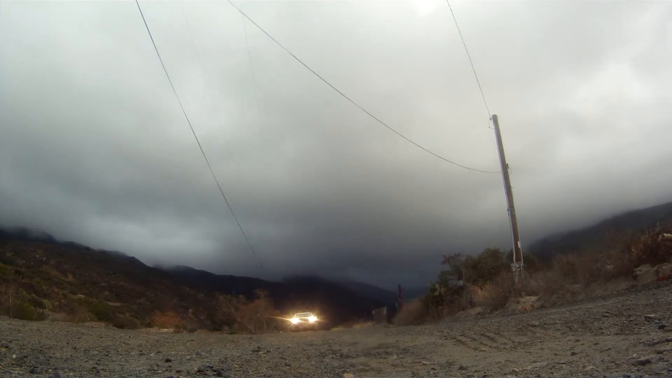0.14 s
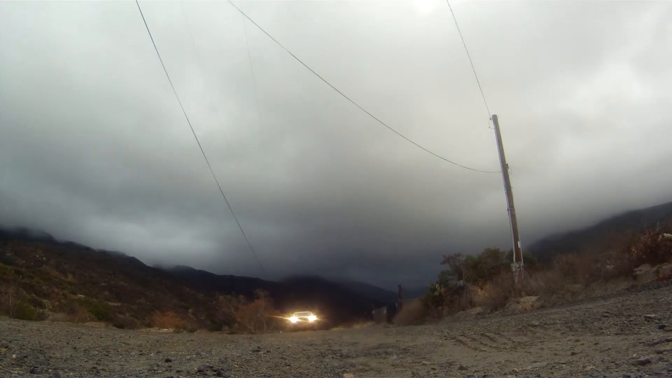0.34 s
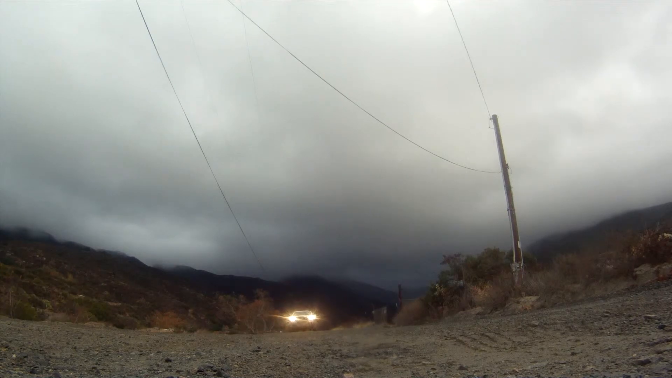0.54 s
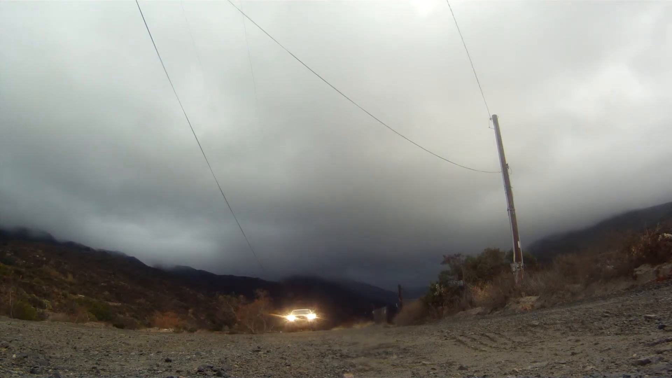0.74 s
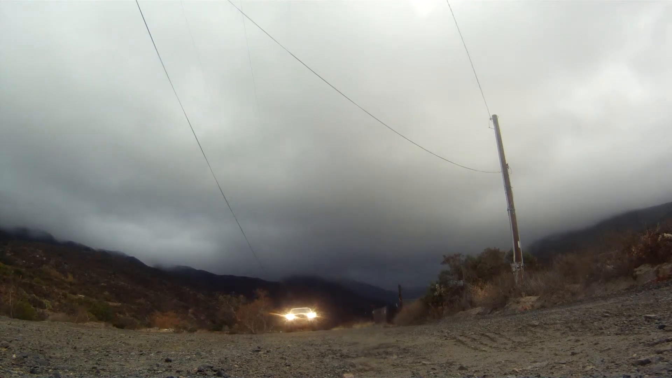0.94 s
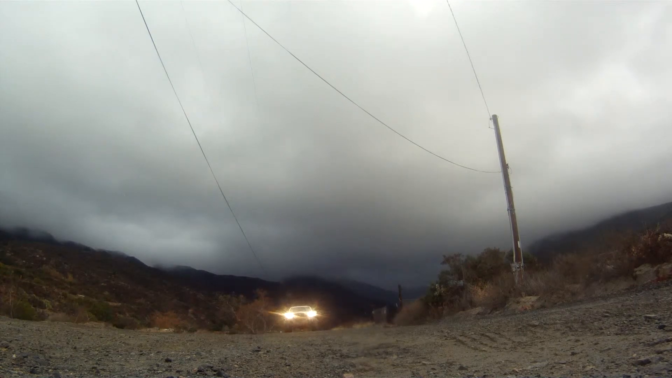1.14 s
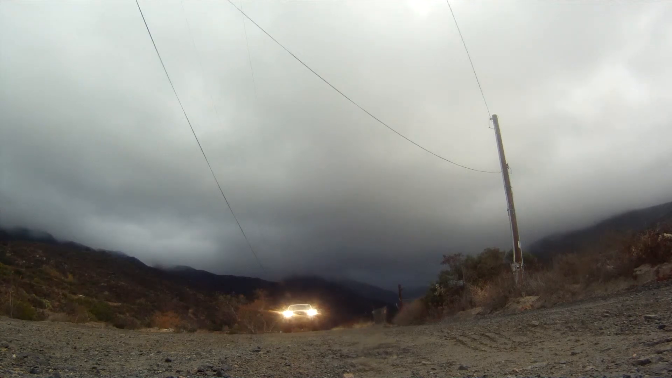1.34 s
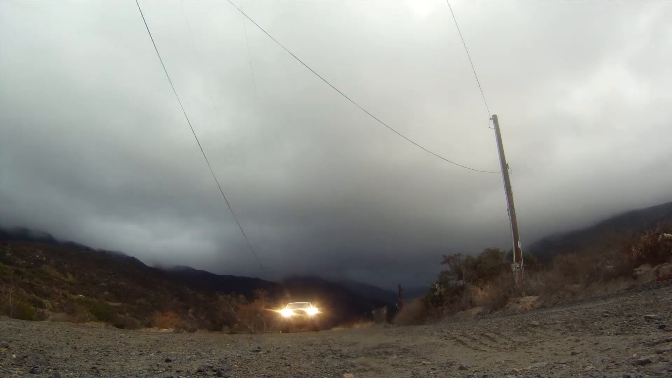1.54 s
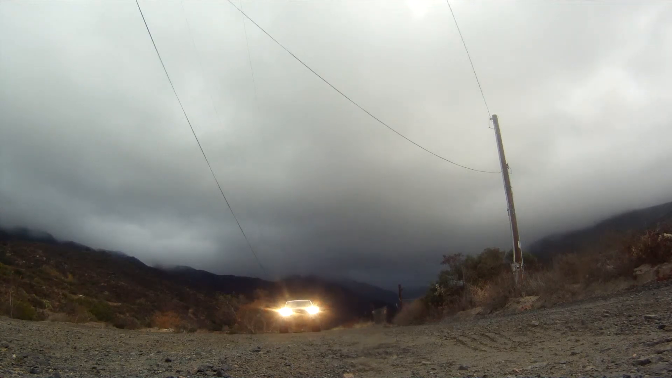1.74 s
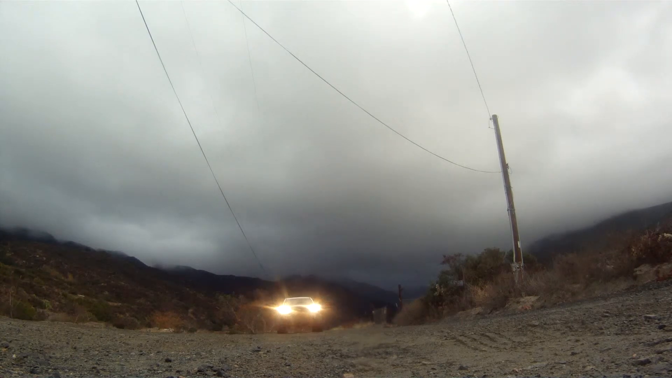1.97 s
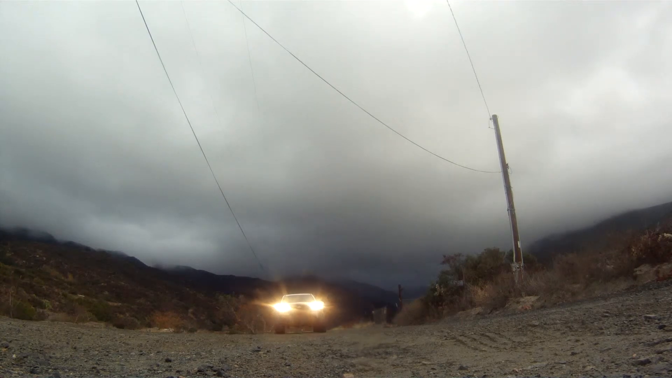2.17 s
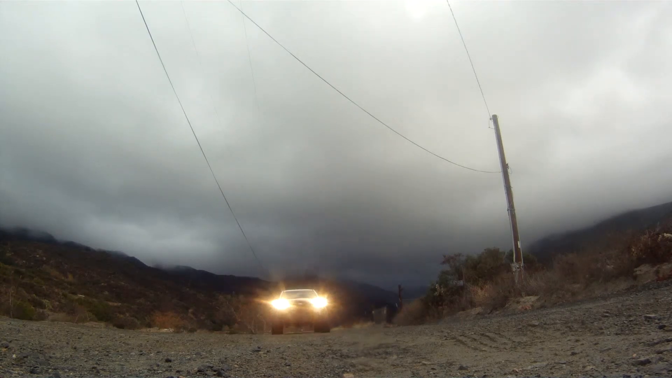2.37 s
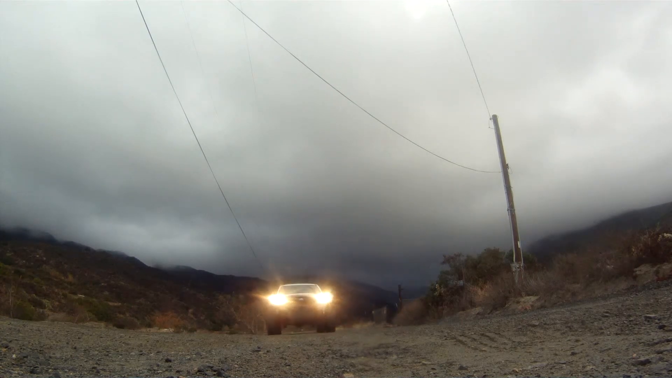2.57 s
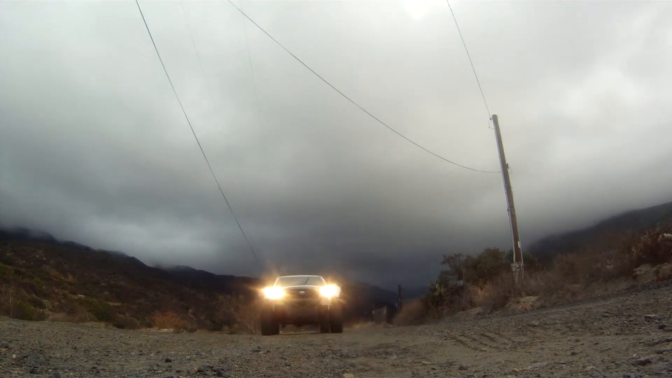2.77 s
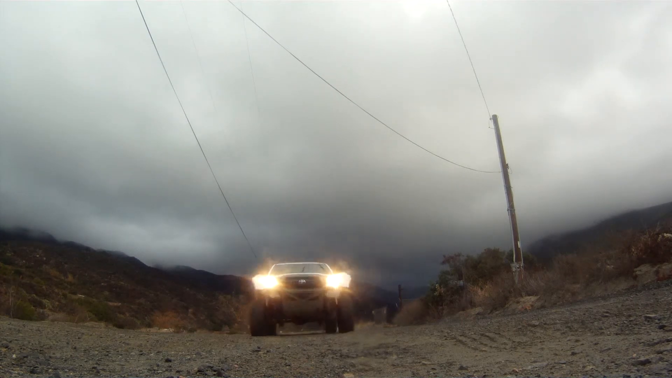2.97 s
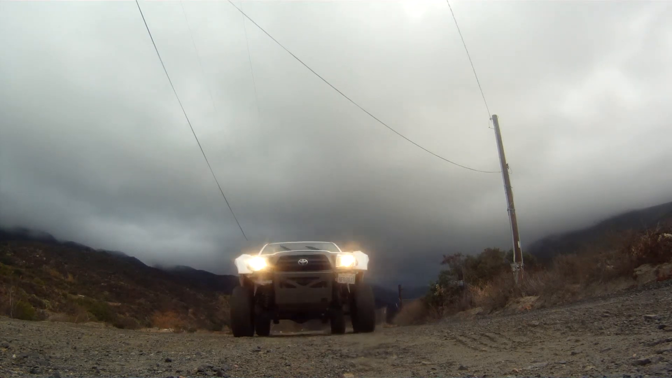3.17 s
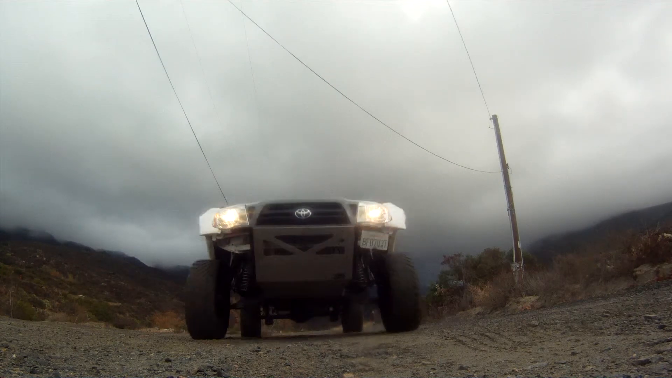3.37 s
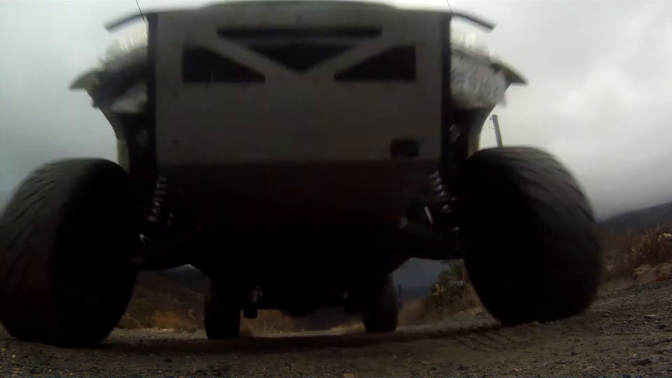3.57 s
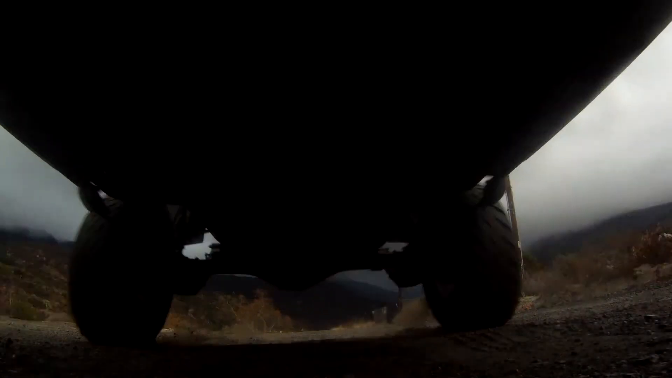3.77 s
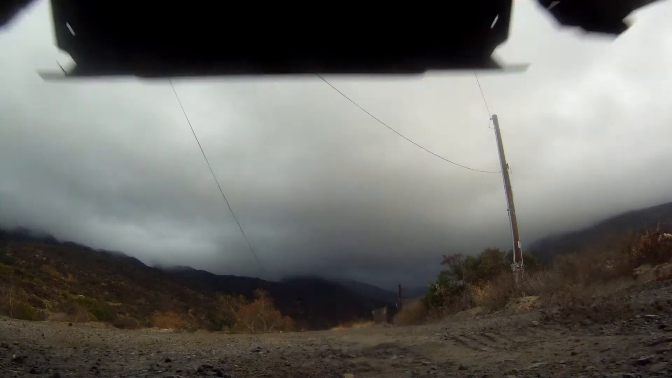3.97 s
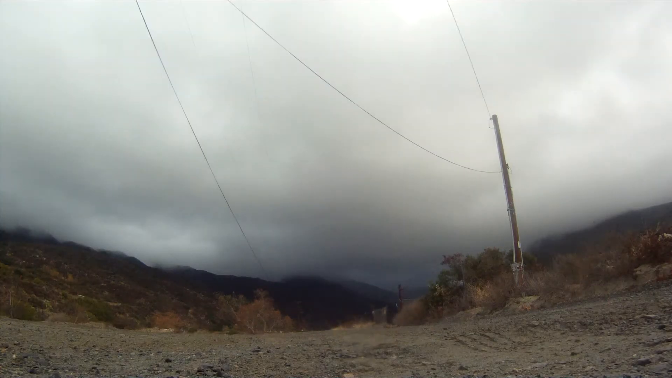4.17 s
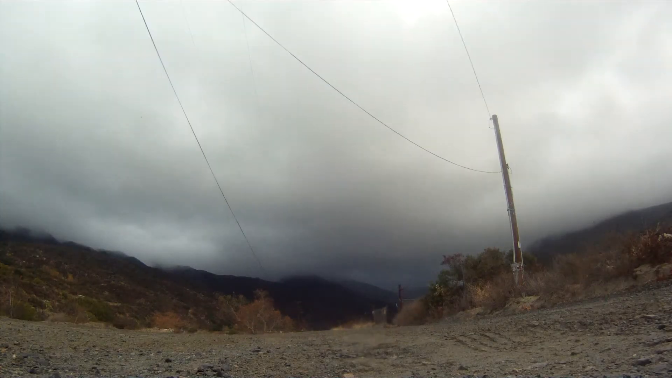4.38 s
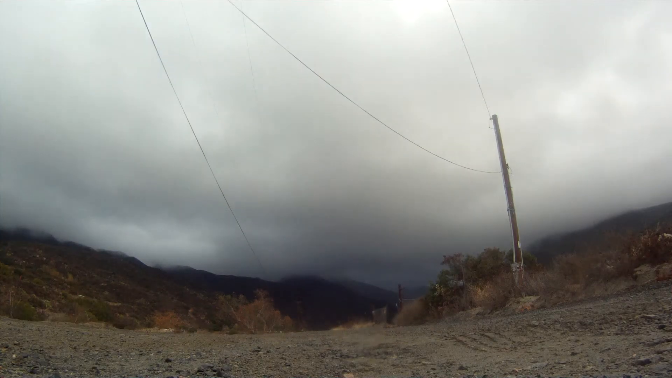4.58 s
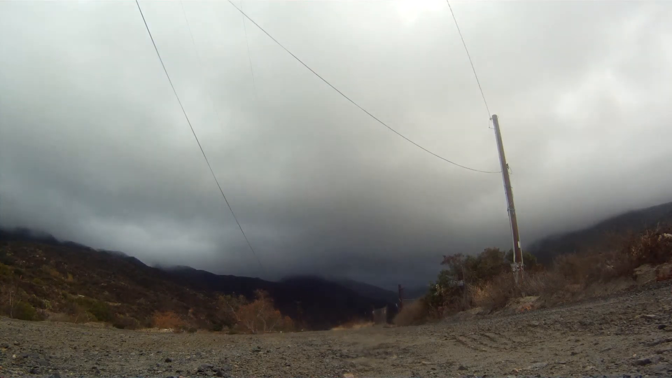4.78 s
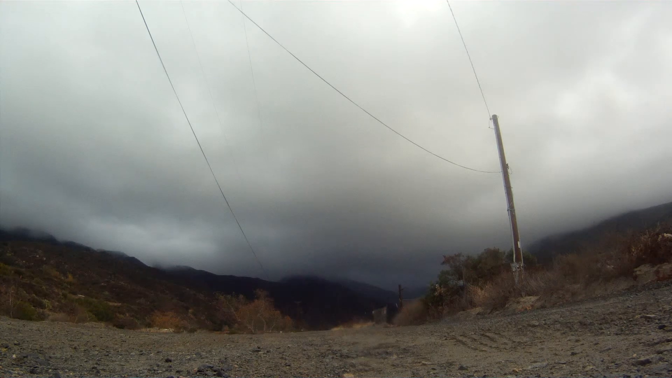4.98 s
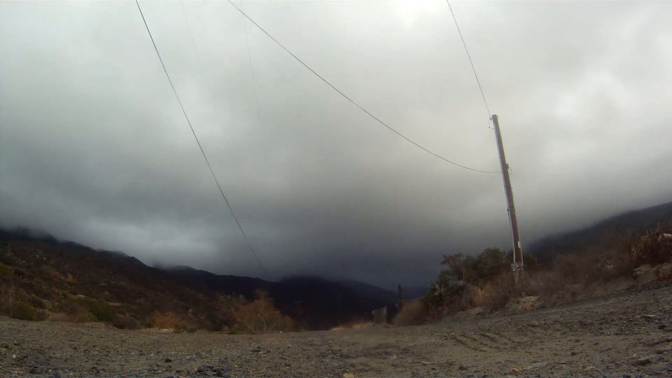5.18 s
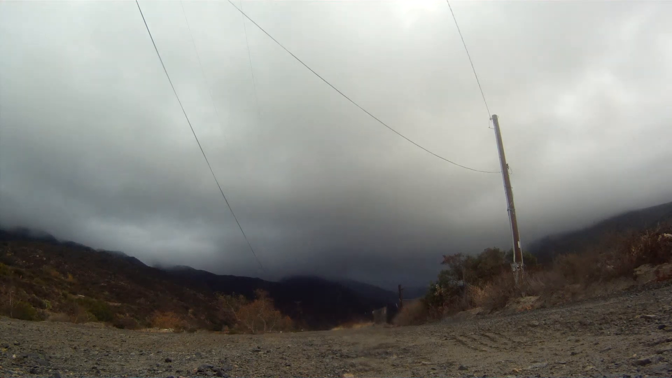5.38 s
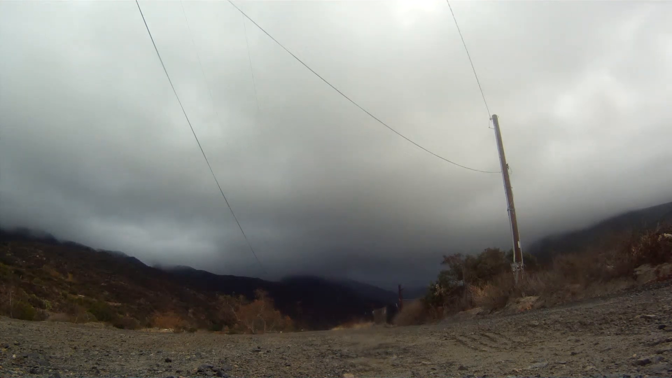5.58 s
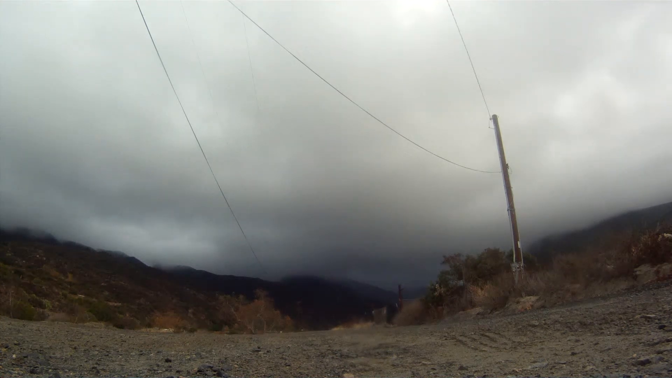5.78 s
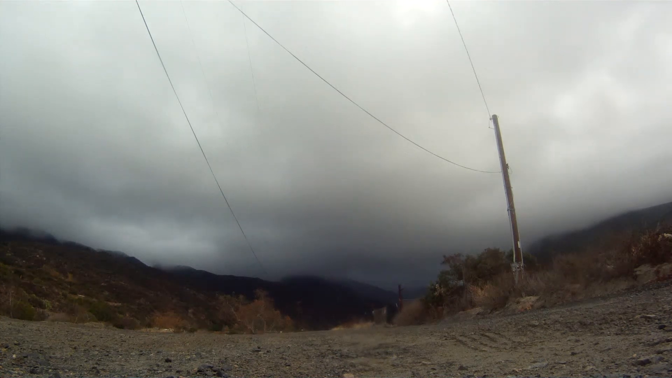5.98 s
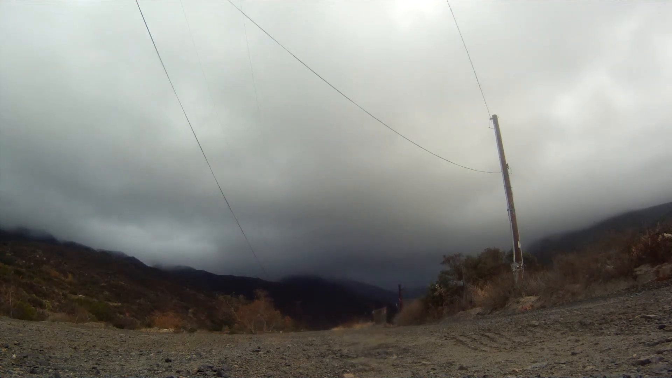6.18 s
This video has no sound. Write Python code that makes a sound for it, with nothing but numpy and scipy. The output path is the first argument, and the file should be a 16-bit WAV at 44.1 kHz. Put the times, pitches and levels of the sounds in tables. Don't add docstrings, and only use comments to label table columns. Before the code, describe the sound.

A pickup approaches on an open gravel track, heard from a ground-level microphone inside a hard hollow case. Distant engine hum and boxy gravel crunch build steadily, with dull clod knocks. The truck thunders overhead with a deep exhaust drone and tyre roar, then falls away sharply. Sand and pebbles tick and rattle on the case, soft wind lumps buffet, and faint gravel noise recedes into low hiss.

```python
import sys
import numpy as np
from scipy import signal
from scipy.fft import rfft, irfft, next_fast_len
from scipy.io import wavfile

SR = 44100
rng = np.random.default_rng(int(sys.argv[2]) if len(sys.argv) > 2 else 0)


def master_out(mix):
    frames = np.transpose(np.atleast_2d(mix))
    ceiling = np.clip(frames, -1, 1)
    pcm = np.round(ceiling * 32767).astype(np.int16)
    wavfile.write(sys.argv[1], SR, pcm)


def natural_amplitude(level_db):
    exponent = np.asarray(level_db, float) / 20
    return 10 ** exponent


N = 274302
TIME_S = np.arange(N) / SR
BUMPER_S, PASS_S = 3.68, 4.05
SPEED_M_S, CLEARANCE_M = 14, 0.6


def evened(x):
    return x / np.sqrt(np.mean(x ** 2) + 1e-20)


def curves(rows):
    s, *columns = np.transpose(rows)
    return [np.interp(TIME_S, s, column) for column in columns]


def colour(x, points):
    size = next_fast_len(N)
    f, db = np.transpose(points)
    hz = np.arange(size // 2 + 1) * SR / size
    gain = natural_amplitude(np.interp(np.log(hz + 1), np.log(f + 1), db, left=-90, right=-90))
    return evened(irfft(rfft(x, size) * gain, size)[:N])


def ring(x, hz, width):
    return signal.lfilter(*signal.iirpeak(hz, hz / width, SR), x)


def double_ring(x, hz, width):
    return ring(ring(x, hz, width), hz, width)


def cavity_edge(x):
    return signal.sosfilt(signal.ellip(5, 1, 30, 1215, fs=SR, output="sos"), x)


def wander(hz):
    return evened(signal.sosfilt(signal.butter(2, hz, fs=SR, output="sos"), rng.standard_normal(N)))


def grains(per_s, spread_db, lump_hz, lump_db, hiss):
    size = natural_amplitude(spread_db * np.minimum(rng.exponential(1, N), 4)) * rng.choice([-1., 1.], N)
    cracks = evened(size * (rng.random(N) < per_s / SR))
    return (cracks + hiss * rng.standard_normal(N)) * natural_amplitude(lump_db * wander(lump_hz))


def passing(stretches):
    power, gone_m = 0, SPEED_M_S * (TIME_S - BUMPER_S)
    for from_m, to_m, db, coming_db, going_db in stretches:
        off_m = gone_m - np.clip(gone_m, from_m, max(to_m, from_m))
        doublings = np.log2(np.hypot(off_m / CLEARANCE_M, 1))
        fall_db = np.where(off_m < 0, coming_db, going_db) * doublings
        power = power + natural_amplitude(db - fall_db) ** 2
    return np.sqrt(power)


def behind(length_s, lead_s=0):
    return np.clip((TIME_S - PASS_S + lead_s) / length_s, 0, 1)


# t/s, firing rate f/Hz, firing tone level/dB, throttle level/dB
ENGINE_RUN = [(0.0, 139.1, -58.5, -3), (0.25, 109.2, -62, 0), (0.75, 100.4, -60.5, -1.5),
              (1.3, 117.3, -59, -9), (1.8, 114.5, -57.5, 3), (1.95, 128.4, -57.5, 5.5),
              (2.3, 123.9, -56, 6), (3.18, 144.1, -47, 0), (3.37, 142.3, -44.5, -7),
              (3.53, 126.9, -42, 7.5), (3.77, 120.3, -27.5, -2), (3.9, 115.4, -22.5, -9),
              (3.97, 105.8, -21, -31), (4.1, 85.5, -38.5, -11), (4.25, 82.9, -53, -8), (4.42, 84, -63, -5),
              (4.52, 135, -59.5, -4), (4.78, 118, -65, -1)]
# multiple of half the firing rate, far level/dB, near level/dB under the exhaust
TONE_FAMILIES = [
    [(2, 0, 0)],
    [(3, 0, -3), (1, -1, -5)],
    [(4, 0, -2.5), (5, -3, -12), (8, -12, -14)],
    [(7, 0, 0), (6, -8, 0), (9, -8, -6)],
]
UNEVEN_DB, OCTAVE_DB, HOWL_DB = -13, -11.5, -16.5
UNEVEN_BY_THROTTLE, OCTAVE_BEHIND_DB, DRIFT_DB = 0.1, 8.5, 3
SHADOW_DB = 2
BAY_S, BAY_LENGTH_S, BAY_DB = 3.69, 0.034, 8
BOUNCE_S, BOUNCE_LENGTH_S, BOUNCE_HZ, BOUNCE_DEPTH = 3.17, 0.22, 6.7, 0.054


def engine():
    hz, tone_db, throttle_db = curves(ENGINE_RUN)
    near = np.clip((tone_db + 42) / 12, 0, 1)
    gone = behind(0.065, lead_s=0.065)
    bay_db = BAY_DB * np.exp(-((TIME_S - BAY_S) / BAY_LENGTH_S) ** 2)
    uneven_db = UNEVEN_DB + UNEVEN_BY_THROTTLE * throttle_db + DRIFT_DB * wander(2.7) + bay_db
    families_db = [0, uneven_db, OCTAVE_DB + OCTAVE_BEHIND_DB * gone, HOWL_DB + throttle_db]
    since = TIME_S - BOUNCE_S
    bounce = BOUNCE_DEPTH * np.cos(2 * np.pi * BOUNCE_HZ * since) * np.exp(-(since / BOUNCE_LENGTH_S) ** 2)
    turns = np.cumsum(hz / 2 * (1 + bounce + 0.0037 * wander(19.4))) / SR
    out = np.zeros(N)
    for family_db, tones in zip(families_db, TONE_FAMILIES):
        for k, far_db, near_db in tones:
            flutter_db = (0.5 + 0.25 * k) * wander(12)
            place_db = (1 - near) * far_db + near * near_db - SHADOW_DB * gone * (k - 2)
            db = tone_db + family_db + place_db + flutter_db
            out += natural_amplitude(db) * np.cos(2 * np.pi * k * turns - 0.23 * k)
    fade = np.clip((ENGINE_RUN[-1][0] - TIME_S) / 0.056, 0, 1)
    return np.sqrt(2) * out * fade


# t/s, level/dB
LOOSE_GRAVEL = [(0, 0.5), (.15, 3), (.42, -2.5), (.62, -0.5), (.76, -4.5), (.95, 6.5), (1.3, 4), (1.42, -1),
                (1.8, 1), (2.1, -2), (2.55, 0), (2.92, 1), (3.2, 2.5), (4.2, -2), (4.45, -1), (5.0, -1.5),
                (5.25, -1), (6.22, -3)]
LOOSE_ROAR, LOOSE_GRIT, LOOSE_FIZZ = 0.3, 1.34, 0.1


def looseness_db():
    return curves(LOOSE_GRAVEL)[0]


# f/Hz, level/dB per Hz
ROAR_TONE = [(45, -12), (70, 4.5), (200, 0.5), (600, -2), (900, -3.5), (1500, -16.5), (3000, -23),
             (6000, -33)]
# from m behind the bumper, to m, overhead level/dB,
# dB lost per doubled distance coming, the same going
ROAR_PLACES = [(1, 1.284, -36.5, 5.5, 11), (2.5, 4.4, -41.5, 15, 8), (3.5, 3.43, -31.5, 26, 27),
               (0.5, 3.2, -47.5, 3.5, 3.1)]


def roar():
    shaking = colour(grains(900, 1.4, 11.0, 0.9, 2.65), ROAR_TONE)
    return shaking * passing(ROAR_PLACES) * natural_amplitude(LOOSE_ROAR * looseness_db() + 3)


# f/Hz, width f/Hz, level/dB truck ahead, level/dB truck behind
CRUNCH_RINGS = [(892, 143, 0, -31), (996, 161, 4.5, -21), (1080, 69, -1, -1), (1110, 146, -32, 7)]
# f/Hz, width f/Hz, level/dB truck ahead, level/dB truck behind
GRIT_RINGS = [(1310, 290, -5.5, 11), (1596, 130, 1.5, 1), (1840, 350, 3, 10), (2123, 110, 7.5, 11),
              (2450, 287, 4.5, 10)]
# f/Hz, level/dB per Hz
FIZZ_TONE = [(2600, -9), (3000, 5.5), (3700, 5), (4300, 6.5), (4700, -25.5), (5500, -2)]
# from m behind the bumper, to m, overhead level/dB,
# dB lost per doubled distance coming, the same going
CRUNCH_PLACES = [(0.4, 2.62, -34.5, 4.96, 11.4), (5, 4.9, -40.5, 40, 13), (4.9, 2.7, -52, 12, 2.49)]
GRIT_PLACES = [(-0.3, 0.2, -39.5, 6.86, 20), (0.6, 4.66, -31.5, 15, 16), (5, 5.6, -42, 20, 5.95)]
FIZZ_PLACES = [(0.4, 1.45, -41, 15.3, 14), (1.2, 4.83, -48, 15, 12.5), (5.0, 6.4, -60.5, 5.3, 3.7)]
RUT_HZ, RUT_DB = 16, 1.2


def case_rings(x, rings):
    gone, out = behind(0.26), 0
    for hz, width, ahead_db, behind_db in rings:
        out = out + natural_amplitude(ahead_db + gone * (behind_db - ahead_db)) * double_ring(x, hz, width)
    return out


def tyres(coarse, fine):
    loose_db = looseness_db() + RUT_DB * wander(RUT_HZ)
    crunch = evened(cavity_edge(case_rings(coarse, CRUNCH_RINGS)))
    grit = evened(case_rings(fine + coarse, GRIT_RINGS))
    fizz = colour(fine, FIZZ_TONE)
    return (passing(CRUNCH_PLACES) * natural_amplitude(loose_db) * crunch
            + passing(GRIT_PLACES) * natural_amplitude(LOOSE_GRIT * loose_db) * grit
            + passing(FIZZ_PLACES) * natural_amplitude(LOOSE_FIZZ * loose_db) * fizz)


# f/Hz, level/dB per Hz
FAN_TONE = [(4200, -22), (4650, -0.5), (5050, -2.5), (5500, -9), (6300, -19.5)]
# from m behind the bumper, to m, overhead level/dB,
# dB lost per doubled distance coming, the same going
FAN_PLACES = [(0.46, 1.0, -45.5, 21, 7.3), (-2.5, 1.0, -60.5, 4, 7.2)]


def fan(fine):
    return passing(FAN_PLACES) * colour(fine, FAN_TONE)


# from m behind the bumper, to m, overhead level/dB,
# dB lost per doubled distance coming, the same going
GUST_PLACES = [(1.2, 4.0, -63, 9.2, 4.9)]
# t/s, level/dB
SWIRLS = [
    (4.17, -54),
    (4.31, -55),
    (4.55, -52.5),
    (4.68, -66),
]
SWIRL_LENGTH_S = 0.042
BREEZE_DB, BREEZE_LUMP_DB = -76, 2.5


def air():
    buffet = colour(rng.standard_normal(N), [(12, -35), (24, 10), (35, 8.5), (52, -0.5), (80, -22)])
    push = natural_amplitude(BREEZE_DB + BREEZE_LUMP_DB * wander(5.6)) + passing(GUST_PLACES)
    for s, db in SWIRLS:
        push = push + natural_amplitude(db) * np.exp(-((TIME_S - s) / SWIRL_LENGTH_S) ** 2)
    return push * buffet


# f/Hz, level/dB per Hz
HISS_TONE = [(12, -50), (20, -3), (104, 2.5), (445, -17), (764, -5.5), (839, -20), (1090, -20),
             (1510, -8.5), (2530, -14.0), (4890, -15.5), (5500, -19.5), (7150, -48), (12100, -120)]


def microphone_hiss():
    return natural_amplitude(-67) * colour(rng.standard_normal(N), HISS_TONE)


# t/s, peak level/dB, ring f/Hz
CLOD_KNOCKS = [(0.835, -41.5, 1011), (0.979, -39, 1045), (1.022, -37, 1000), (1.056, -40.5, 885),
               (1.153, -36, 1080), (1.214, -41, 1010), (1.25, -60, 970), (1.322, -39, 1010),
               (1.825, -39.5, 1068), (1.851, -65, 1040), (2.312, -62, 1010), (2.442, -37.5, 1047),
               (3.275, -27.5, 1004), (3.382, -28.5, 900), (3.93, -23.5, 724), (4.287, -33, 1290),
               (4.955, -54, 1150), (4.997, -41.5, 1145), (5.098, -59, 1100)]


def clods():
    out, t = np.zeros(N), np.arange(2000) / SR
    rattle = rng.standard_normal((len(CLOD_KNOCKS), 2000))
    crumble = np.minimum(t / 0.00035, 1) * np.exp(-(t / 0.022) ** 2)
    for (s, db, hz), noise in zip(CLOD_KNOCKS, rattle):
        knock = cavity_edge(double_ring(noise * crumble, hz, 240))
        out[round((s - 0.004) * SR):][:2000] += natural_amplitude(db - 8.5) * knock / abs(knock).max()
    return out


# from m behind the bumper, to m, overhead level/dB,
# dB lost per doubled distance coming, the same going
THRUM_PLACES = [(5.2, 6, -45.5, 6, 5)]


def thrum():
    throb = colour(rng.standard_normal(N), [(70, 18), (110, -10), (180, 11.0), (260, -12.5), (340, -15)])
    return behind(0.12) * passing(THRUM_PLACES) * throb


# t/s, rms level/dB, centre f/Hz, width f/Hz, length s
SAND_SHOWERS = [(3.978, -37, 4200, 1000, 0.0066), (4.208, -54, 3500, 500, 0.023),
                (4.286, -45, 1810, 1390, 0.021), (4.308, -47, 1950, 900, 0.04),
                (4.36, -53, 1940, 1480, 0.087), (4.506, -67, 5000, 603, 0.03),
                (4.574, -64, 4800, 900, 0.024), (4.728, -68, 4300, 2500, 0.035),
                (4.941, -60, 1940, 700, .03), (4.978, -58.5, 600, 500, 0.07),
                (5.273, -69, 4000, 3000, 0.022), (5.345, -67, 3600, 2500, 0.023),
                (5.412, -71, 4270, 2080, 0.021), (6.047, -69.5, 3230, 2400, 0.044)]


def showers():
    out, t = np.zeros(N), np.arange(3000) / SR
    patter = rng.standard_normal((len(SAND_SHOWERS), 3000)) ** 3
    for (s, db, hz, width, length), noise in zip(SAND_SHOWERS, patter):
        shape = np.minimum(t / 0.002, 1) * np.exp(-(t / length) ** 4)
        out[round(s * SR):][:3000] += natural_amplitude(db) * evened(double_ring(noise, hz, width)) * shape
    return out


# t/s, peak level/dB, ring f/Hz, upper ring relative level/dB, ring time s
PEBBLE_HITS = [(4.1938, -38.5, 2380, -11, 0.014), (4.2086, -40, 2450, -9, 0.014),
               (4.2756, -42, 2420, -12, 0.015), (4.3125, -40, 1920, -15, 0.012),
               (4.3258, -39, 2375, -5.5, 0.0079), (4.367, -50, 2160, -19, 0.015),
               (4.3817, -39.5, 1997, -11, 0.0097), (4.3964, -41, 2140, -31.5, 0.012),
               (4.4729, -31.5, 2480, -5, 0.0065), (4.4849, -42.5, 2400, -8, 0.017),
               (4.558, -52.5, 2248, 1, 0.042), (4.611, -46, 2060, -3.5, 0.013),
               (4.621, -45, 1870, -6, 0.0076), (4.739, -59, 2420, -14, 0.014),
               (4.8144, -68, 2010, -8, 0.015), (5.101, -52.5, 1870, -7, 0.013),
               (5.1464, -51.5, 1930, -10, 0.016), (5.34, -69, 2440, -13, 0.017),
               (5.476, -60.5, 1830, 1, 0.013)]
UPPER_HZ, UPPER_SLOPE = 2160, 0.64


def pebbles():
    out, t = np.zeros(N), np.arange(900) / SR
    rattle = rng.standard_normal((len(PEBBLE_HITS), 900))
    for (s, db, hz, upper_db, ring_s), noise in zip(PEBBLE_HITS, rattle):
        decay_db = -60 * t / ring_s
        tone = np.sin(2 * np.pi * hz * t) * natural_amplitude(decay_db)
        upper = np.sin(2 * np.pi * (UPPER_HZ + UPPER_SLOPE * hz) * t) * natural_amplitude(upper_db + decay_db)
        crack = np.sin(2 * np.pi * 5150 * t) + 0.72 * evened(ring(noise, 4400, 1187))
        crack = crack * natural_amplitude(upper_db - 5.5 - 60 * t / 0.011)
        out[round(s * SR):][:900] += natural_amplitude(db + 4.5) * (tone + upper + crack) * np.minimum(t / 0.00039, 1)
    return out


def scene():
    coarse = grains(600, 4.4, 43, 0.69, 0.97)
    fine = grains(1500, 2.5, 23, 0.85, 1.0)
    truck = engine() + roar() + fan(fine) + thrum()
    gravel = tyres(coarse, fine) + clods() + showers() + pebbles()
    return (truck + gravel + air() + microphone_hiss())[None]


def held_steps(x):
    edge = signal.firwin(61, 5650, window=("kaiser", 3), fs=SR)
    coarse = signal.upfirdn(edge, signal.resample_poly(x, 160, 147), down=4)[8:]
    held = signal.resample_poly(np.repeat(coarse, 4), 147, 160)
    return np.pad(held, (0, N))[:N]


def thin_top(x, from_hz, top_hz, gate_db):
    hz, _, z = signal.stft(x, SR, nperseg=1024)
    keep = ((hz < from_hz)[:, None] | (abs(z) > natural_amplitude(gate_db))) & (hz < top_hz)[:, None]
    return signal.istft(z * keep, SR, nperseg=1024)[1][:N]


def roll_off(x):
    return signal.sosfilt(signal.butter(12, 16020, fs=SR, output="sos"), x)


def record(dry):
    held = held_steps(dry[0])
    mix = thin_top(held, from_hz=13400, top_hz=15330, gate_db=-103)
    return roll_off(mix[None])


dry = scene()
out = record(dry)
master_out(out)
```